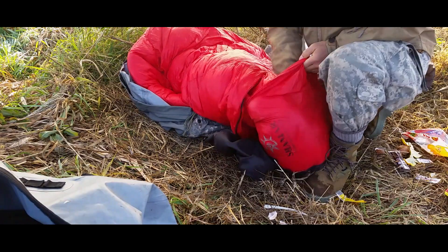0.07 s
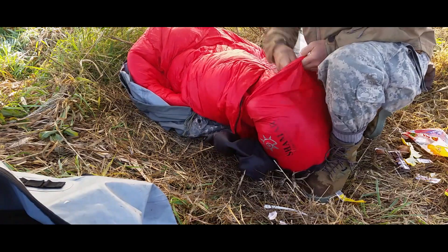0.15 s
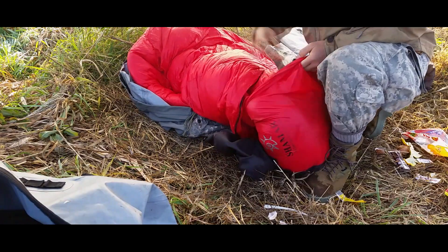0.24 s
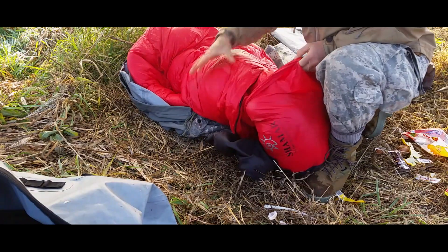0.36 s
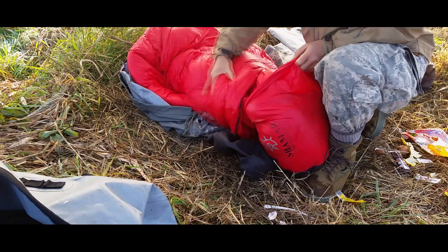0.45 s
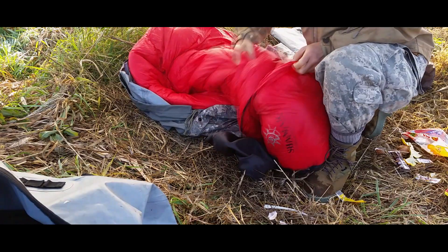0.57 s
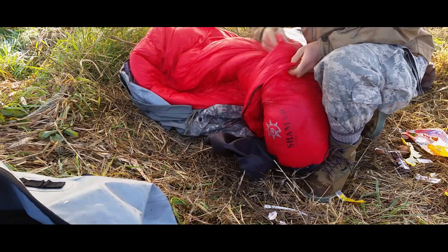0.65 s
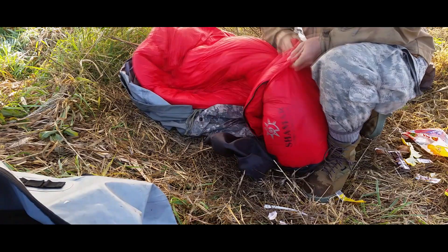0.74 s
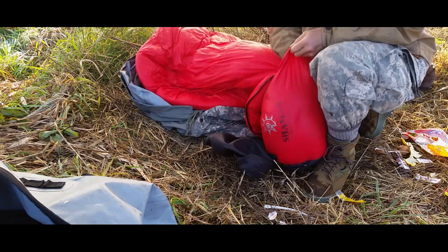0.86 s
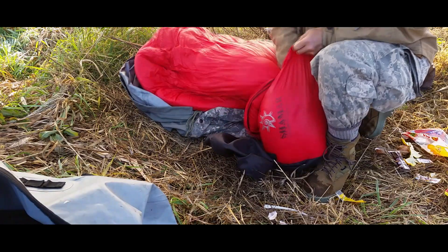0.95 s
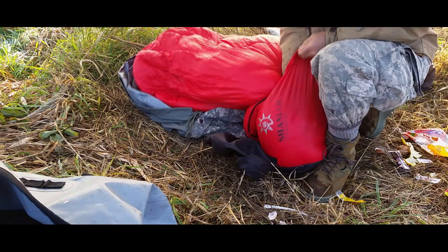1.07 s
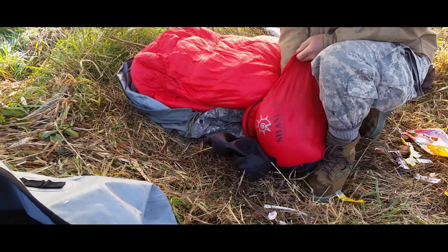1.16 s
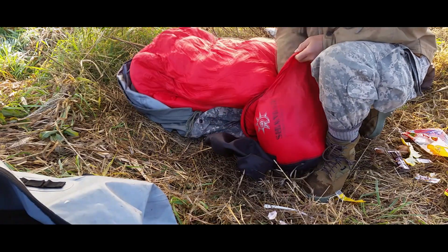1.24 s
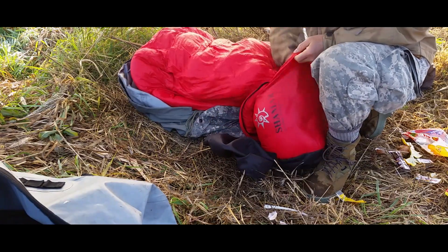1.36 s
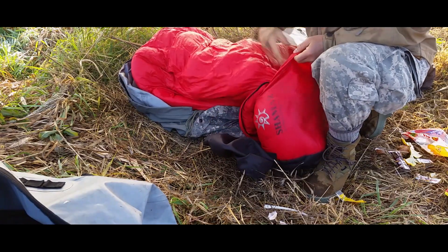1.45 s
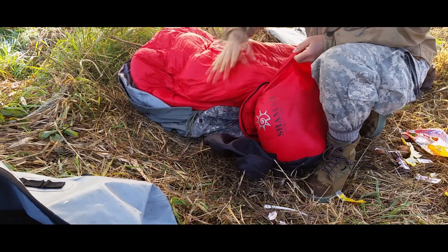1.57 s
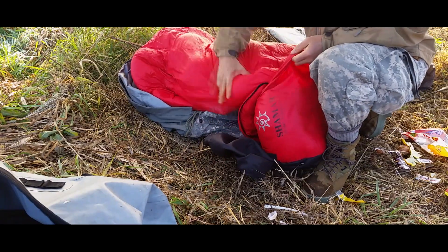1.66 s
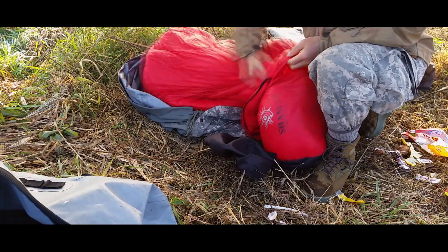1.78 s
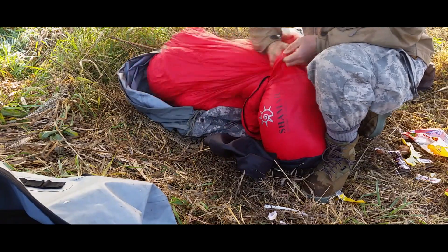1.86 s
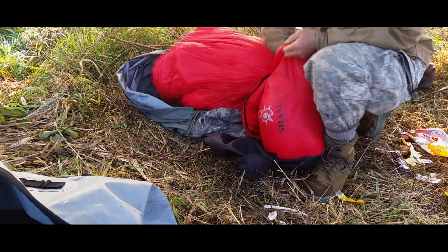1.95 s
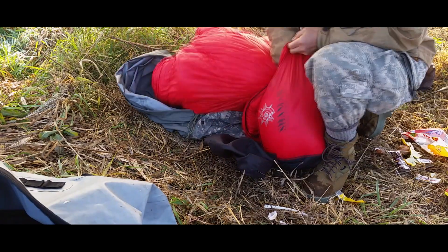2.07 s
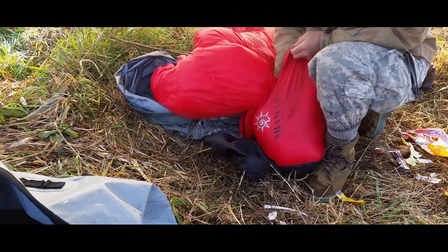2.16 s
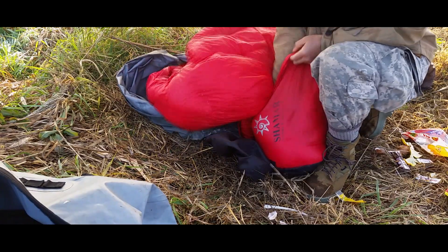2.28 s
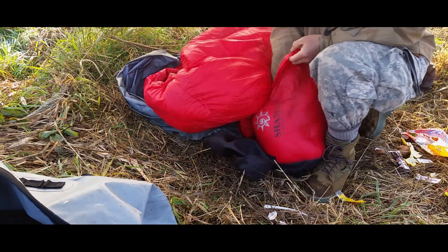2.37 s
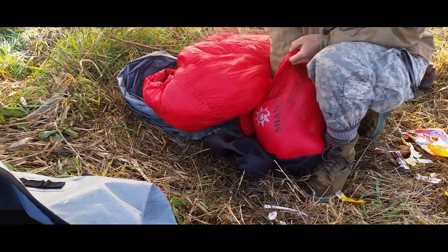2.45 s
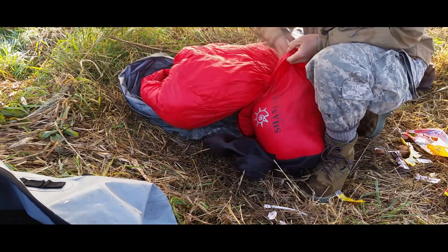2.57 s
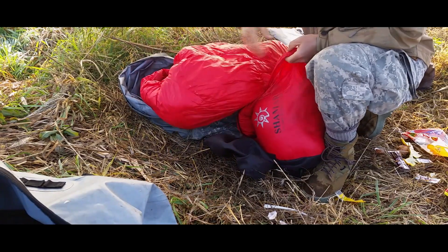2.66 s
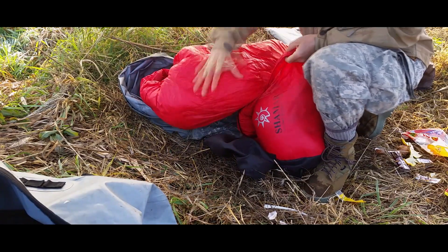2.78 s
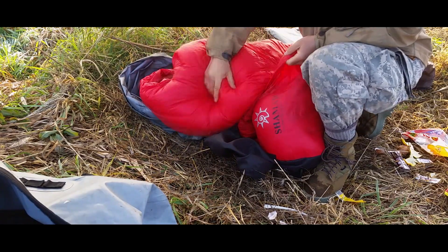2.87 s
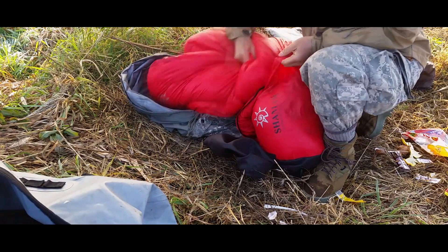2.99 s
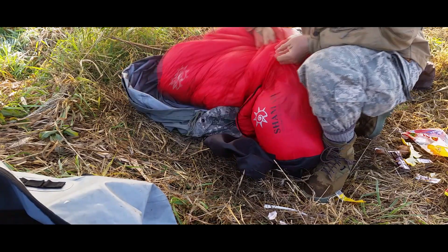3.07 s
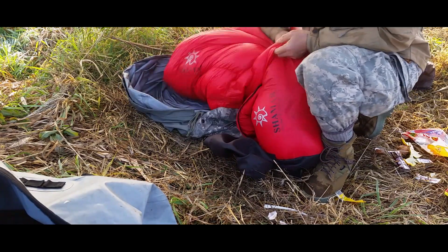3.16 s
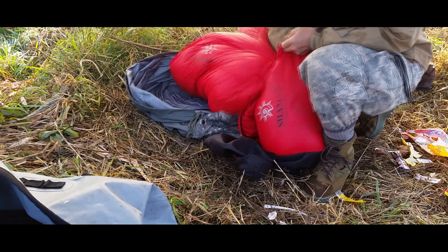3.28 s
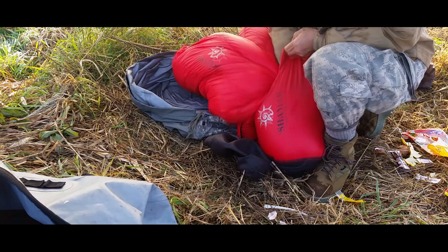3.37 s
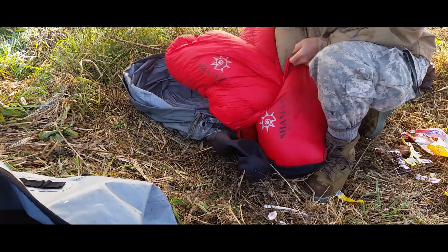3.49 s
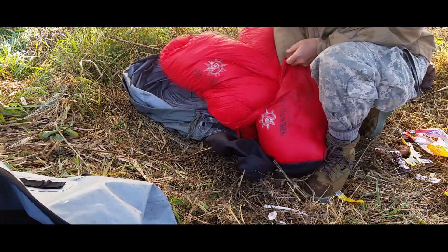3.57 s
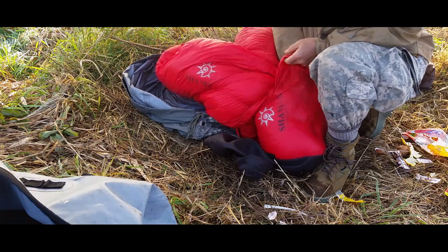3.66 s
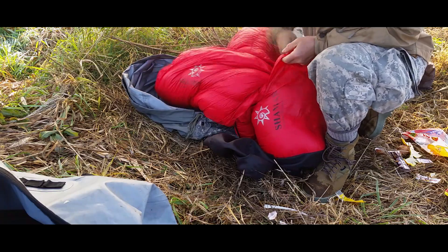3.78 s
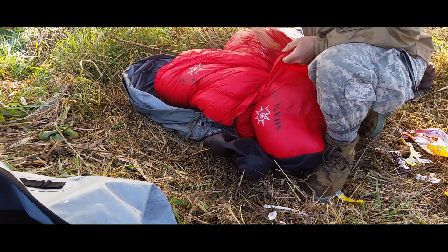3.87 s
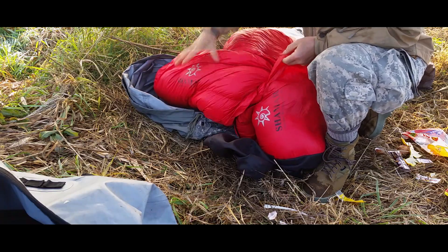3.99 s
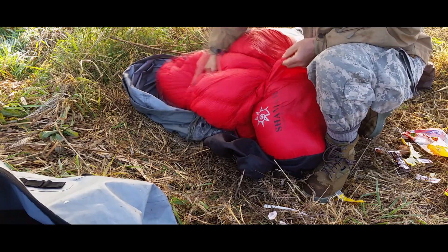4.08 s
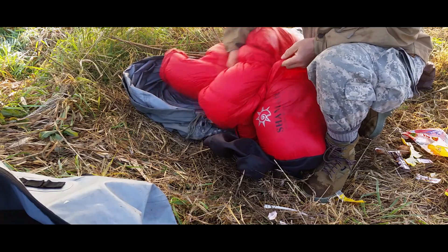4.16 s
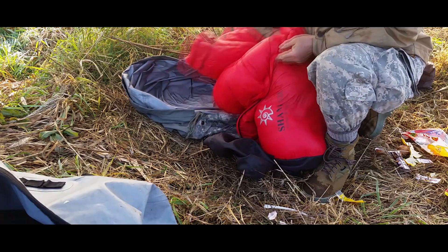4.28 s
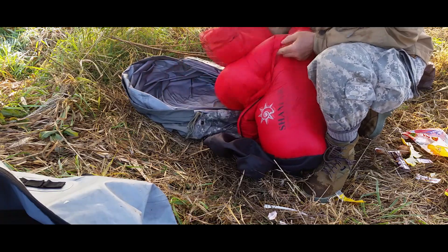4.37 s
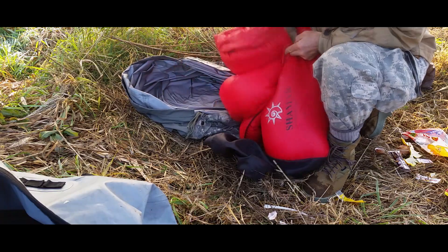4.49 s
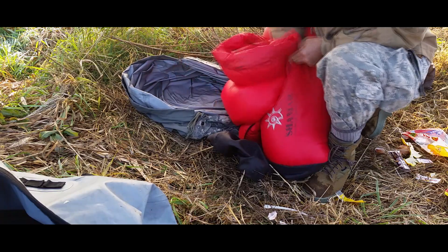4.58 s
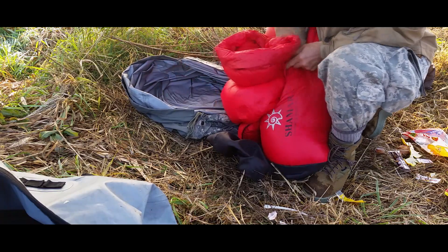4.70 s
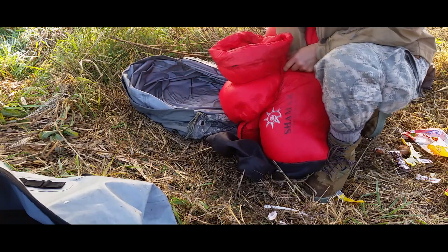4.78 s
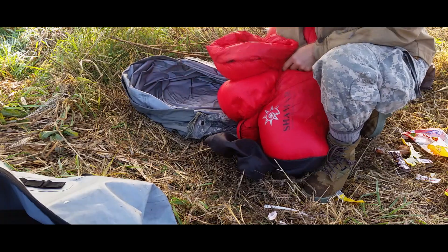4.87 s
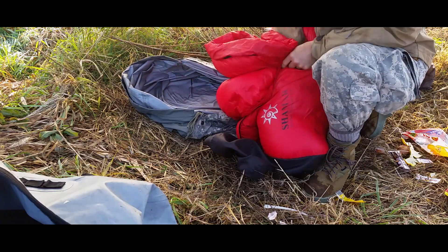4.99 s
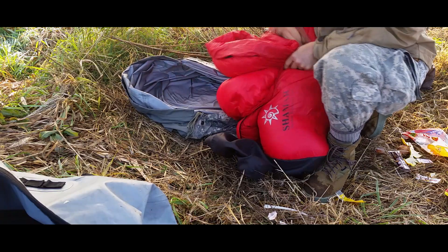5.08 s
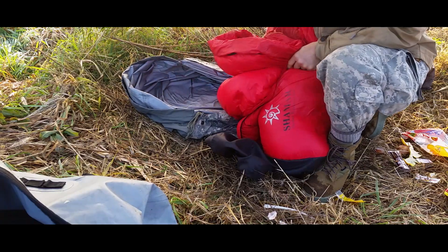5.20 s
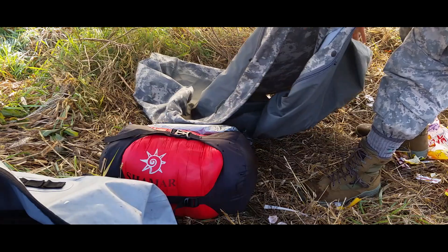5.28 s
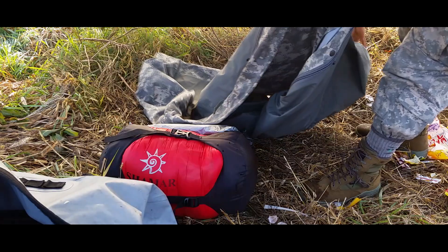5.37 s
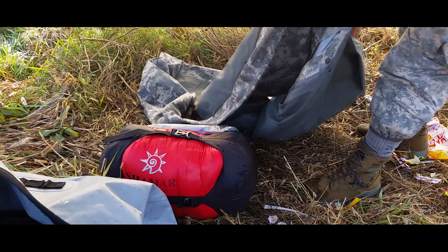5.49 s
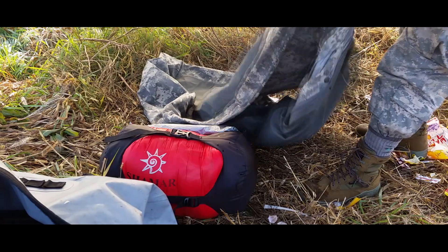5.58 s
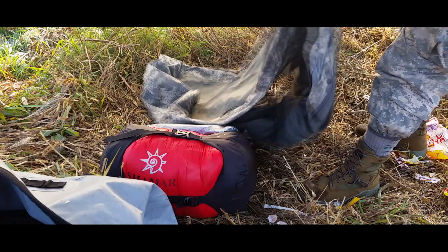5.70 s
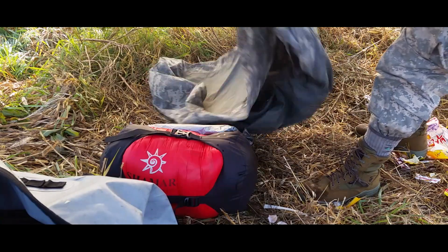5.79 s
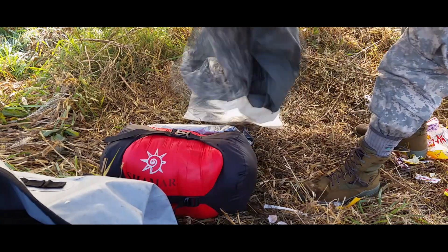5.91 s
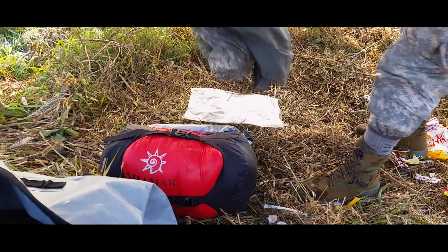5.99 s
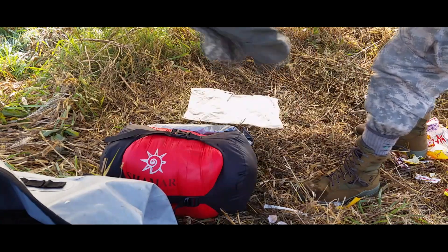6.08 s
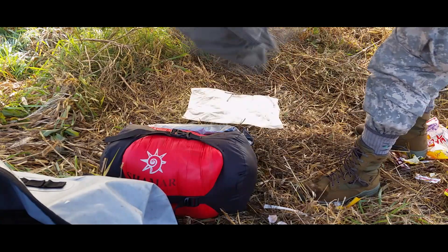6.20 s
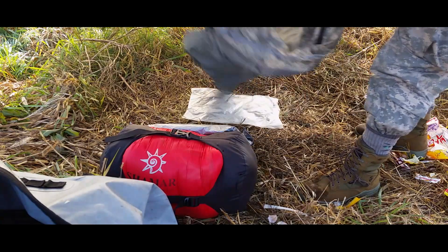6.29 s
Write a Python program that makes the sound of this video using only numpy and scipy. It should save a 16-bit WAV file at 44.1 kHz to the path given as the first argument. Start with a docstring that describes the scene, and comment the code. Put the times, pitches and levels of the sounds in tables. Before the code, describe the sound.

Close nylon rustling and soft pats come in uneven bursts over faint open-air hiss, ending with the loud crumpling and flapping of a sheet.

```python
"""A nylon sleeping bag is grabbed and stuffed by hand into its sack, stroke after stroke; then a
stiffer ground sheet is lifted and shaken. The weave swishes in tiny slips, folds crumple, the padding
heaves and the sack booms softly. Hands pat the cloth, creases snap and skipping threads zip.
A far rumble and the faint hiss of an open field lie underneath."""
import sys
import numpy as np
from scipy import signal
from scipy.fft import rfft, irfft, next_fast_len
from scipy.io import wavfile
from scipy.ndimage import uniform_filter1d, map_coordinates

SR = 44100
rng = np.random.default_rng(int(sys.argv[2]) if len(sys.argv) > 2 else 0)


def generate_wav(sig):
    """Save sig (samples, or channels by samples) to the path in sys.argv[1] as 16-bit PCM at SR."""
    pcm = np.round(np.clip(np.atleast_2d(sig).T, -1, 1) * 32767).astype(np.int16)
    wavfile.write(sys.argv[1], SR, pcm)


N = 279726

# tone of the nylon in loud swishes and snaps: freq_hz, gain_db
LOUD_NYLON = [(1800, -17.5), (3000, -8.5), (4500, -9.5), (6300, -7.5), (7500, -11.5), (8700, -1.5),
              (10600, 1.5), (12500, -13), (15600, -16), (16000, -49)]


def amp(db):
    """Decibels to gain."""
    return 10 ** (np.asarray(db) / 20)


def unit(x):
    """Scaled to rms 1."""
    return x / np.sqrt(np.mean(x ** 2) + 1e-20)


def along(points, hz):
    """Read (freq_hz, value) points on a log frequency axis."""
    freqs, values = np.transpose(points)
    return np.interp(np.log(hz + 1), np.log(freqs + 1), values)


def curves(rows):
    """One value per sample for each column after the time."""
    times, *columns = np.transpose(rows)
    return [np.interp(np.arange(N) / SR, times, column) for column in columns]


def filtered(x, response):
    """Filter by a gain given as a function of frequency."""
    size = next_fast_len(N + 8192)
    return irfft(rfft(x, size) * response(np.fft.rfftfreq(size, 1 / SR)), size)[..., :N]


def coloured(pair, tone):
    """A noise pair shaped by a tone curve, at rms 1."""
    return unit(filtered(pair, lambda hz: amp(along(tone, hz))))


def patchy(pair, depth_db):
    """Patches of the spectrum swell and fade, as when folds slide at their own speeds."""
    bins = signal.stft(pair, nperseg=256)[2]
    drift = uniform_filter1d(rng.standard_normal(bins.shape[1:]), size=6, axis=0)
    drift = uniform_filter1d(drift, size=8, axis=1)
    return signal.istft(bins * amp(depth_db * unit(drift)), nperseg=256)[1][:, :N]


def slips(per_s, t60_s, spread_db, bed):
    """A noise pair in bursts: the weave lets go at random, each slip dying fast over a steady bed."""
    kicks = (rng.random(N) < per_s / SR) * amp(2 * spread_db * rng.standard_normal(N))
    power = signal.lfilter([1], [1, -amp(-120 / (t60_s * SR))], kicks)
    return np.sqrt(bed + power / power.mean()) * rng.standard_normal((2, N))


def glide(events, width_hz, fade_s=0.0289):
    """A narrow noise band follows a moving pitch, fading in and out: a point source, mid only."""
    points = []
    for start, length, first, middle, last, db in events:
        end = start + length
        points += [(start - fade_s, first, -90), (start, first, db), (start + length / 2, middle, db),
                   (end, last, db), (end + fade_s, last, -90)]
    pitch_hz, level_db = curves(points)
    wander = unit(filtered(rng.standard_normal((2, N)), lambda hz: np.exp(-(hz / width_hz) ** 2)))
    phase = 2 * np.pi * np.cumsum(pitch_hz) / SR
    return np.outer([1, 0], amp(level_db) * (wander[0] * np.sin(phase) + wander[1] * np.cos(phase)))


def stereo(pair, likeness):
    """Mid and side to left and right, wider where the likeness is low."""
    angle = lambda hz: np.arccos(np.clip(along(likeness, hz), 0, 1)) / 2
    mid, side = filtered(pair, lambda hz: np.array([np.cos(angle(hz)), np.sin(angle(hz))]))
    return np.array([mid + side, mid - side])


def open_field():
    """Far rumble and faint hiss from all round."""
    # tone of the ambience: freq_hz, gain_db
    tone = [(12, -52), (20, 0.5), (75, -3), (176, -14.5), (1470, -29), (4200, -32.5), (7500, -40),
            (10400, -30), (14200, -37), (14600, -94)]
    # narrow bass, wide treble: freq_hz, left_right_likeness
    likeness = [(60, .95), (110, 0.88), (200, 0.26), (700, 0.15), (2400, 0.21), (5000, .05)]
    air = patchy(rng.standard_normal((2, N)), depth_db=1.1)
    return stereo(amp(-55) * coloured(air, tone), likeness)


def whistle():
    """A faint, thin whistle sounds twice near the end."""
    # whistle tones: start_s, length_s, first_hz, middle_hz, last_hz, level_db
    tones = [(5.62, .12, 5150, 5170, 5130, -56), (6.04, .05, 5030, 5040, 5050, -56)]
    return glide(tones, width_hz=18)


def thread_zips():
    """Threads skip over threads, the pitch following their speed."""
    # short, high zips: start_s, length_s, first_hz, middle_hz, last_hz, level_db
    zips = [(.125, .025, 9140, 9700, 9800, -46), (.93, .035, 10500, 11000, 11200, -41),
            (1.025, 0.03, 11200, 10700, 10050, -36), (1.32, 0.12, 6300, 8000, 11000, -53),
            (2.12, .08, 10750, 11200, 10200, -39), (2.49, .07, 8600, 9000, 9400, -45),
            (3.375, 0.056, 10530, 11400, 10000, -37), (4.55, 0.063, 10400, 10300, 10400, -48),
            (5.735, .012, 10400, 10400, 10300, -62)]
    return glide(zips, width_hz=820)


def crease_snaps(t60_s=0.009, sheen_lift_db=9):
    """A crease flips: a sudden bright burst."""
    # flipping creases: start_s, level_db
    snaps = [(0.4473, -43), (0.8936, -40), (1.5599, -50), (2.8406, -44), (2.857, -37), (2.9204, -41),
             (4.0906, -46), (5.2869, -41), (5.4244, -41), (5.7655, -16.5), (5.771, -35), (5.9772, -24),
             (6.0897, -34), (6.117, -29), (6.1495, -23), (6.1525, -14), (6.3354, -18)]
    bursts, t = np.zeros((2, N + SR)), np.arange(SR // 20) / SR
    for start, db in snaps:
        at = round(start * SR)
        bursts[:, at:at + len(t)] += amp(db - 60 * t / t60_s) * rng.standard_normal((2, len(t)))
    tone = lambda hz: amp(along(LOUD_NYLON, hz) + 2.5 + sheen_lift_db * (hz > 12000))
    return filtered(bursts[:, :N], tone)


def hand_pats(push_t60_s=0.043, knock_t60_cycles=11.3, crackle_t60_s=0.017):
    """Each landing sucks in sharply, rebounds as a low push with a dead knock, and crackles."""
    # hands and folds landing: start_s, push_db, push_hz, knock_db, knock_hz, crackle_db
    pats = [(0.464, -42, 102, -51, 400, -53), (0.499, -41, 168, -47, 990, -57),
            (1.002, -39, 141, -32.5, 606, -43), (1.089, -32, 170, -38, 363, -35),
            (1.7035, -50, 202, -46, 500, -50), (1.709, -46, 122, -40, 894, -51),
            (1.806, -43, 105, -65, 353, -58), (2.124, -47, 143, -56, 345, -55),
            (2.18, -35, 154, -36, 420, -36), (2.203, -33, 154, -27.5, 670, -37),
            (2.859, -44, 149, -53, 353, -58), (2.937, -46, 127, -40.5, 754, -56),
            (3.471, -47, 102, -38.5, 346, -53), (4.09, -40, 103, -36.5, 1250, -65),
            (4.094, -27.5, 133, -39.5, 375, -50), (4.143, -47, 203, -42, 1220, -62),
            (4.168, -49, 121, -49, 363, -60), (4.574, -39, 102, -46, 585, -41),
            (4.592, -38, 180, -31, 630, -46), (4.606, -43.5, 140, -40, 519, -44),
            (5.289, -43, 100, -44, 1010, -58), (5.366, -46, 127, -46.5, 730, -60),
            (5.446, -40.5, 185, -42, 740, -56), (5.607, -41, 102, -42, 343, -44),
            (5.623, -45, 312, -55, 794, -41), (5.96, -50, 151, -33, 835, -42),
            (6.054, -50, 305, -34.5, 375, -59), (6.074, -52, 213, -23.5, 830, -48),
            (6.135, -24.5, 308, -21.5, 620, -47), (6.144, -20.5, 104, -19.5, 443, -21),
            (6.158, -31, 297, -22.5, 466, -27), (6.169, -17, 102, -23, 462, -30),
            (6.175, -23, 217, -14, 403, -20), (6.181, -28, 150, -21, 600, -13),
            (6.194, -34, 300, -19, 520, -29), (6.204, -32, 323, -21, 420, -23),
            (6.218, -29, 148, -27, 600, -22), (6.235, -30, 160, -27, 398, -36),
            (6.251, -39, 245, -21.5, 1200, -41), (6.283, -30, 316, -25, 344, -16.5),
            (6.298, -34, 275, -13, 414, -26), (6.33, -34, 261, -20.5, 450, -26.5)]
    # tone of the crackle: freq_hz, gain_db
    crackle_tone = [(300, -7), (900, -0.5), (1800, 10.5), (3300, 2), (6000, -8.5), (12000, -3),
                    (14500, -60)]
    thuds, crackles = np.zeros((2, 2, N + SR))
    t = np.arange(SR // 8) / SR
    for start, push_db, push_hz, knock_db, knock_hz, crackle_db in pats:
        span = slice(round(start * SR), round(start * SR) + len(t))
        push = np.sin(2 * np.pi * push_hz * t) * amp(-60 * t / push_t60_s) * (1 - np.exp(-t / 0.00013))
        knock = np.sin(2 * np.pi * knock_hz * t) * amp(-60 * t * knock_hz / knock_t60_cycles)
        thuds[0, span] -= amp(push_db) * push / abs(push).max() + amp(knock_db) * knock / abs(knock).max()
        crackles[:, span] += amp(crackle_db - 60 * t / crackle_t60_s) * rng.standard_normal((2, len(t)))
    return thuds[:, :N] + filtered(crackles[:, :N], lambda hz: amp(along(crackle_tone, hz)))


def handling():
    """Swish, sheen, crumple and heave envelopes in dB: moves swell, hold and fade; their powers add."""
    # the stiff sheet, dragged up and shaken: time_s, swish_db, sheen_db, crumple_db, heave_db
    sheet = [(5.28, -86, -90, -88, -86), (5.287, -51, -54, -58, -57), (5.46, -60, -64, -55.5, -62),
             (5.485, -59.5, -60, -64, -74), (5.713, -46.5, -51, -47.5, -49.5),
             (5.743, -38, -49, -48.5, -48), (5.779, -44.5, -50, -50.5, -57.5),
             (5.86, -39.5, -44.5, -42.5, -52.5), (6.005, -41.5, -41, -47.5, -52.5),
             (6.03, -48, -47, -47.5, -54.5), (6.1, -48.5, -45, -41.5, -44.5), (6.116, -38, -37, -34.5, -37),
             (6.165, -28.5, -33, -22.5, -34), (6.24, -35, -38, -30.5, -33.5),
             (6.315, -40, -38.5, -33, -39.5), (6.34, -50, -33, -26, -35)]
    # a hand gathers still cloth: start_s, swell_s, hold_s, swish_db, swell_db, crumple_db, heave_db
    gathers = [(0.445, 0.24, 0.34, -54, 7.5, -59, -61.5), (1.691, 0.03, 0.28, -54, 4, -61, -60),
               (2.837, 0.22, 0.099, -54, 11, -62.5, -59), (4.064, 0.37, .13, -56, 3.5, -63, -60.5)]
    # shoves into the sack, the arm drawn out, and short tugs:
    # full_at_s, rise_s, hold_s, fall_s, swish_db, sheen_db, crumple_db, heave_db
    strokes = [(0.038, .13, .12, 0.14, -51.5, -50.5, -59.5, -59.5),
               (1.006, 0.15, 0.062, 0.099, -41, -38.5, -49.5, -50.5),
               (1.242, 0.11, 0.2, 0.17, -52.5, -51, -60, -62),
               (1.568, 0.031, .005, 0.035, -56, -56, -58, -62),
               (1.654, .04, 0.025, 0.029, -60, -68, -64, -66), (1.98, 0.058, .02, .08, -55, -66, -60, -79),
               (2.149, 0.18, .065, 0.093, -40, -41, -48.5, -50.5),
               (2.537, 0.58, 0.029, 0.13, -49.5, -49.5, -57.5, -58.5),
               (2.859, 0.01, 0.0022, .03, -59, -62, -53.5, -53),
               (2.918, 0.058, 0.022, 0.097, -62.5, -65, -55, -58),
               (3.341, 0.18, 0.11, 0.081, -41, -45, -48.5, -50.5),
               (3.698, 0.37, 0.09, 0.25, -52, -54.5, -58, -62),
               (4.091, 0.015, .005, 0.083, -50.5, -59, -52, -68),
               (4.33, 0.086, .03, 0.081, -52.5, -56, -59, -58),
               (4.543, 0.12, 0.07, .07, -37, -41, -45, -51), (4.771, 0.33, 0.35, 0.088, -53, -53, -59, -60)]
    t = np.arange(N) / SR
    depth = np.c_[[1, 1, 0.7, 0.7]]  # crumple and heave swell and fade less deeply
    fade_db, gather_fall_s, ease = 20, 0.067, 1.17
    power = amp(2 * np.array(curves(sheet)))
    for start, swell, hold, swish, swell_db, crumple, heave in gathers:
        down_db = swell_db * np.clip(1 - (t - start) / swell, 0, 1)
        down_db += fade_db * np.clip(t - start - swell - hold, 0, None) / gather_fall_s
        levels = [swish, swish - 4, crumple, heave]
        power += (t >= start) * amp(2 * (np.c_[levels] - depth * down_db))
    for full_at, rise, hold, fall, *levels in strokes:
        ramp = np.clip(full_at - t, 0, None) / rise + np.clip(t - full_at - hold, 0, None) / fall
        power += amp(2 * (np.c_[levels] - depth * fade_db * ramp ** ease))
    return 10 * np.log10(power)


def crumpling_folds(level_db):
    """Folds crumple in a grainy midrange rustle."""
    # tone of the folds: freq_hz, gain_db
    tone = [(150, -35), (350, -7.5), (700, -5), (1500, -9), (2800, -11.5), (4300, -20.5), (7000, -24),
            (9000, -24), (12000, -90)]
    grains = patchy(slips(per_s=300, t60_s=0.011, spread_db=2, bed=5), depth_db=2)
    return amp(level_db) * coloured(grains, tone)


def heaving_padding(heave_db):
    """The padding heaves, and the sack's boom follows with a smaller swing."""
    # soft body of the padding: freq_hz, gain_db
    heave_tone = [(90, -42), (150, -2.5), (250, -3), (420, -11.5), (700, -31.5)]
    # low boom of the sack: freq_hz, gain_db
    boom_tone = [(30, -27), (60, -1.5), (95, 0.5), (140, -1.5), (200, -34.5)]
    heave = coloured(slips(per_s=88, t60_s=0.058, spread_db=3, bed=1.7), heave_tone)
    boom = coloured(rng.standard_normal((2, N)), boom_tone)
    boom_db = -54.5 + 0.64 * (heave_db + 59)
    return amp(heave_db) * heave + amp(boom_db) * boom


def sliding_nylon(swish_db, sheen_db, split_hz=12000):
    """The sliding weave swishes, with a bright sheen above the split."""
    # tone of the nylon in soft swishes: freq_hz, gain_db
    soft_nylon = [(1800, -13.5), (3000, -7), (4200, -9), (6300, -7.5), (7400, -10.5), (8800, -1.5),
                  (10400, 1.5), (12500, -21.5), (14500, -24), (15000, -28), (15300, -70)]
    loud_share = np.clip((swish_db + 47) / 6, 0, 1)
    weave = patchy(slips(per_s=600, t60_s=0.006, spread_db=2.5, bed=5), depth_db=1.3)
    mix = np.zeros((2, N))
    for tone, share in (soft_nylon, 1 - loud_share), (LOUD_NYLON, loud_share):
        slide = coloured(weave, tone)
        sheen = filtered(slide, lambda hz: 1 / (1 + (split_hz / (hz + 1)) ** 24))
        mix += share * (amp(swish_db) * unit(slide - sheen) + amp(sheen_db) * unit(sheen))
    return mix


def place_cloth(pair):
    """The cloth sits close and off centre: bass reaches both sides at once, treble one side later."""
    # width of the cloth: freq_hz, left_right_likeness
    likeness = [(50, 0.97), (300, 0.99), (700, 0.85), (2000, 0.7), (3400, 0.53), (4800, 0.26), (6200, 0.34),
                (7500, 0.37), (9000, 0.084), (10300, 0.33), (11700, 0.24), (14500, 0.17)]
    # balance: freq_hz, left_over_right_db
    balance = [(60, -0.5), (180, -1), (550, -0.5), (1650, 0.5), (4970, -4.5), (15000, -0.5)]
    # the cloth crosses sides at the end: time_s, left_lag_samples
    left_lag = [(0, 3.5), (5.3, 3), (5.8, 4), (6.1, -1), (6.34, -4.5)]
    near = filtered(stereo(pair, likeness), lambda hz: amp(np.outer([0.5, -0.5], along(balance, hz))))
    bass = filtered(near, lambda hz: 1 / (1 + (hz / 1100) ** 4))
    half_lag = curves(left_lag)[0] / 2
    treble = [map_coordinates(channel, [np.arange(N) - lag], order=5, mode="nearest")
              for channel, lag in zip(near - bass, (half_lag, -half_lag))]
    return bass + treble


def scene():
    """The handled cloth up close, over the open field."""
    swish_db, sheen_db, crumple_db, heave_db = handling()
    cloth = sliding_nylon(swish_db, sheen_db) + crumpling_folds(crumple_db) + heaving_padding(heave_db)
    accents = hand_pats() + crease_snaps() + thread_zips() + whistle()
    return place_cloth(cloth + accents) + open_field()


def record(dry, low_cut_hz=40, top_hz=15850):
    """The deepest bass is thinned and the highest treble is cut off."""
    return filtered(dry, lambda hz: (hz < top_hz) * hz ** 2 / (hz ** 2 + low_cut_hz ** 2))


dry = scene()
out = record(dry)
generate_wav(out)
```